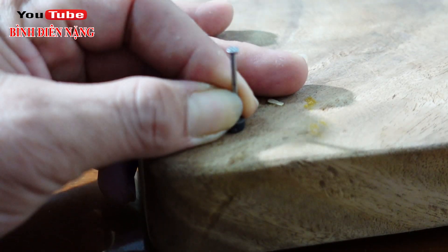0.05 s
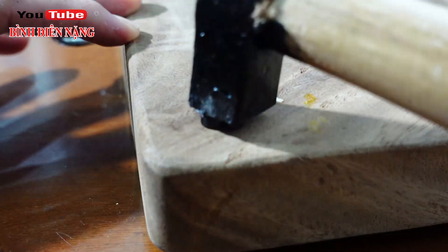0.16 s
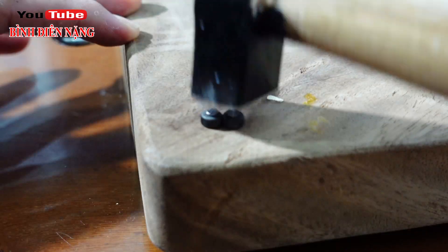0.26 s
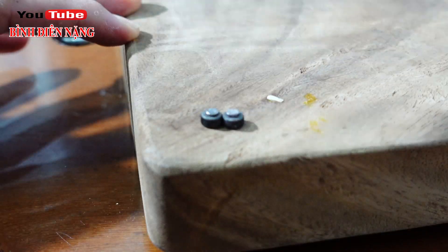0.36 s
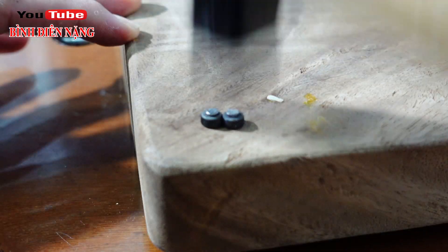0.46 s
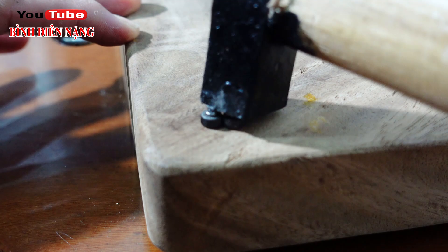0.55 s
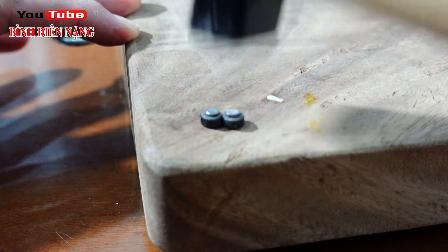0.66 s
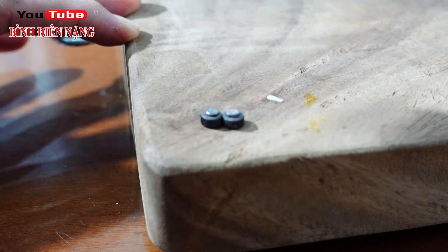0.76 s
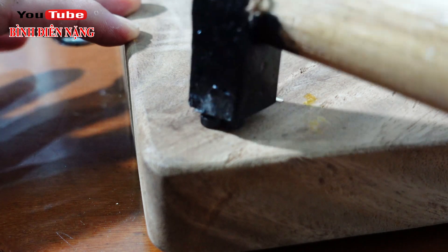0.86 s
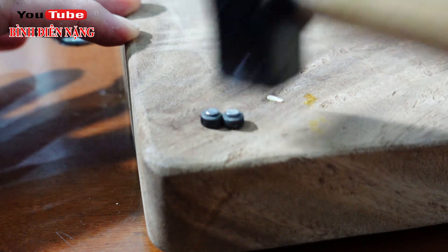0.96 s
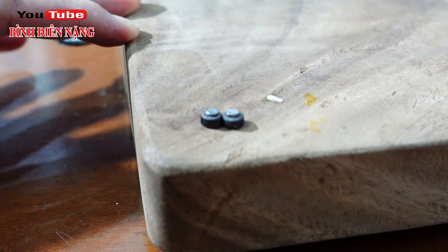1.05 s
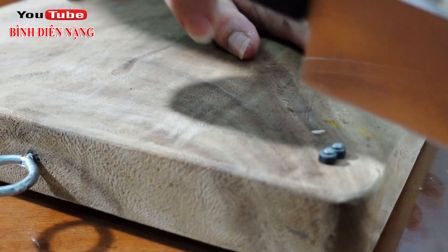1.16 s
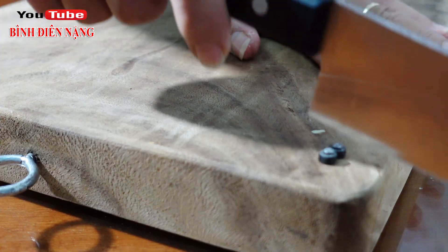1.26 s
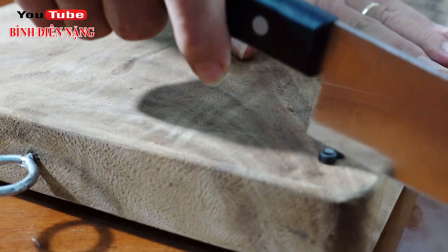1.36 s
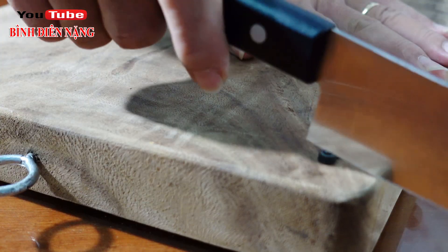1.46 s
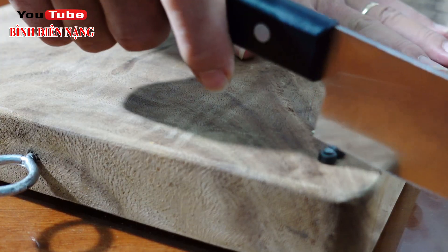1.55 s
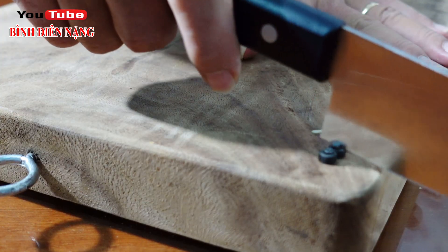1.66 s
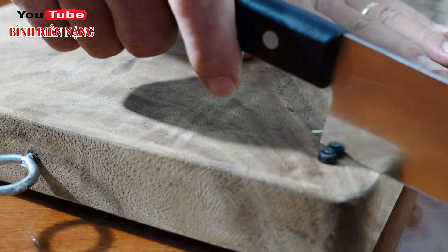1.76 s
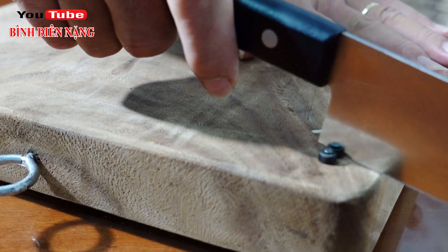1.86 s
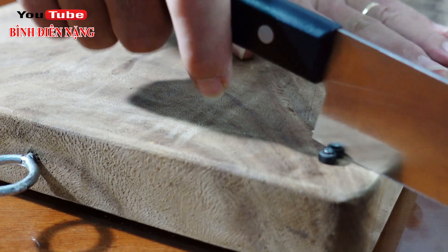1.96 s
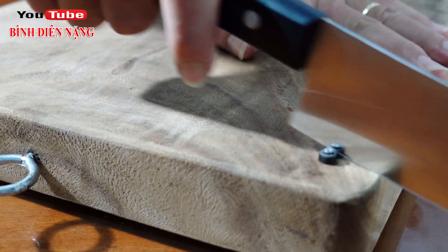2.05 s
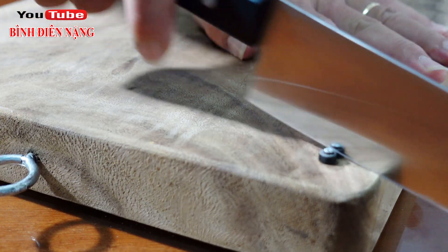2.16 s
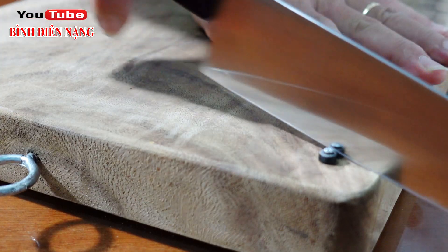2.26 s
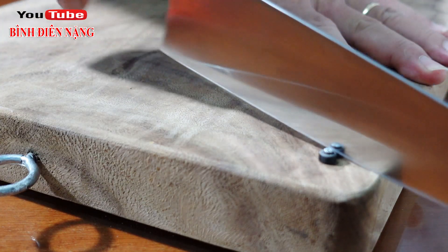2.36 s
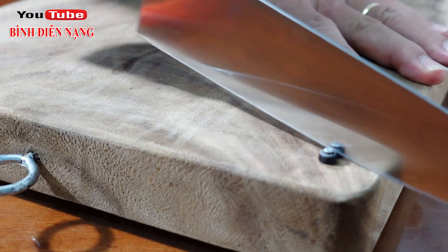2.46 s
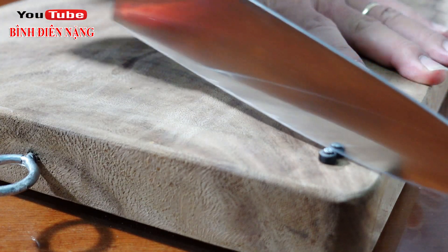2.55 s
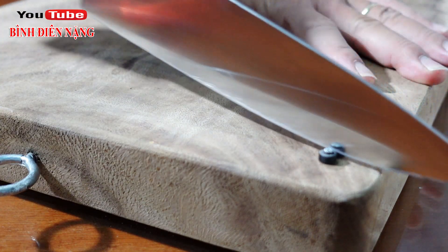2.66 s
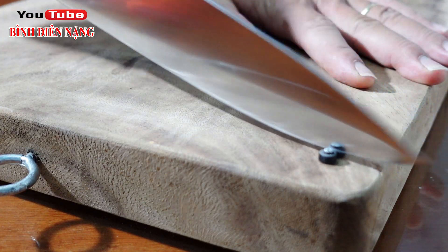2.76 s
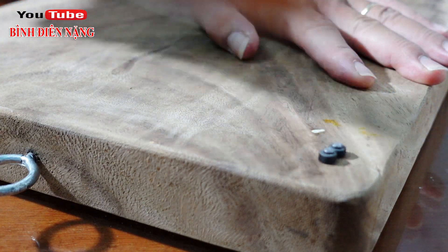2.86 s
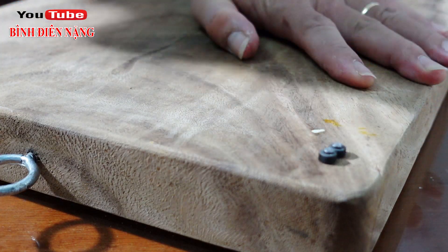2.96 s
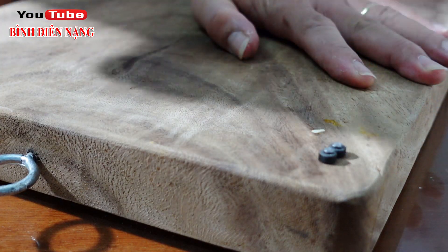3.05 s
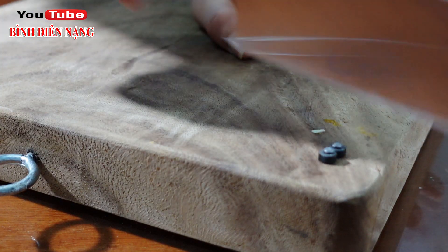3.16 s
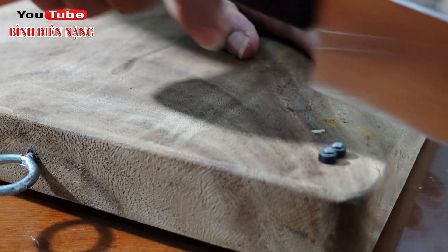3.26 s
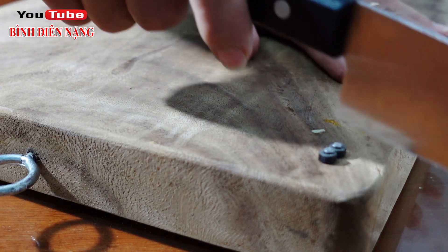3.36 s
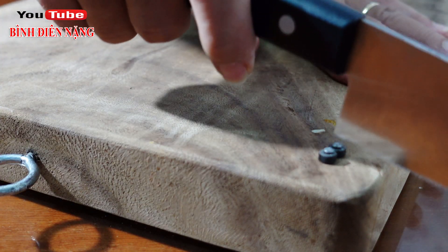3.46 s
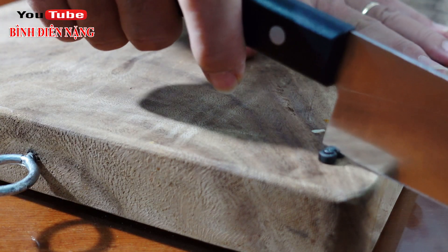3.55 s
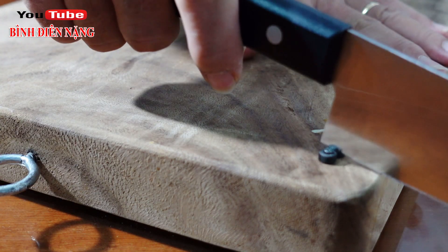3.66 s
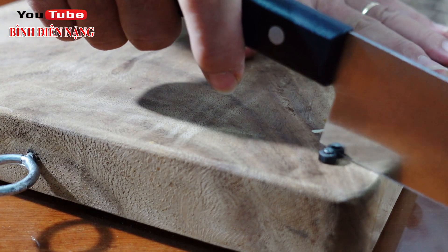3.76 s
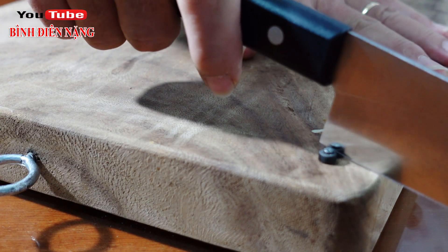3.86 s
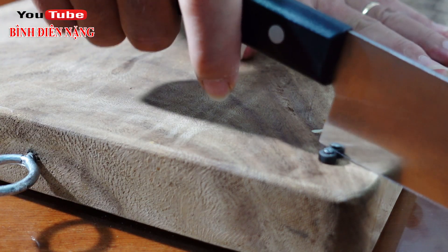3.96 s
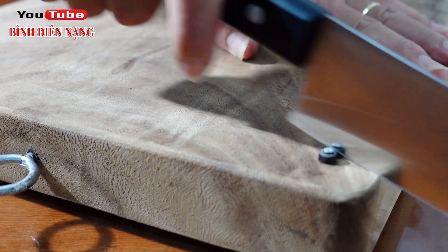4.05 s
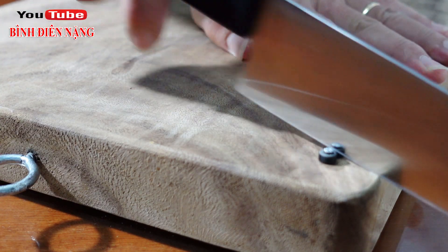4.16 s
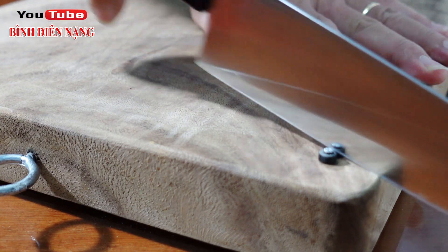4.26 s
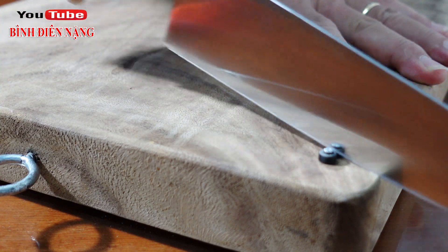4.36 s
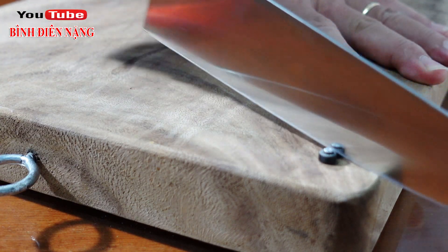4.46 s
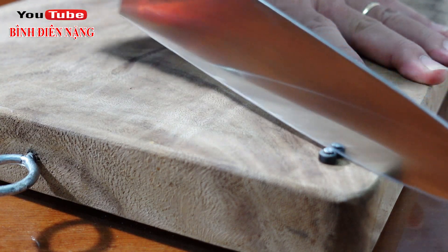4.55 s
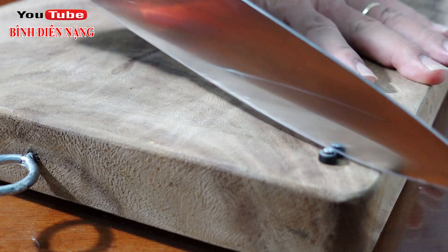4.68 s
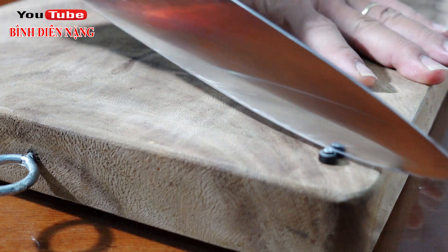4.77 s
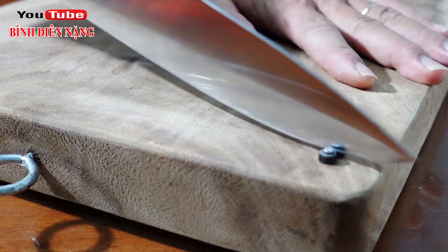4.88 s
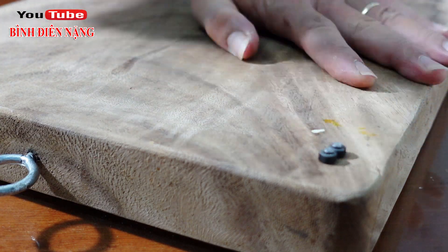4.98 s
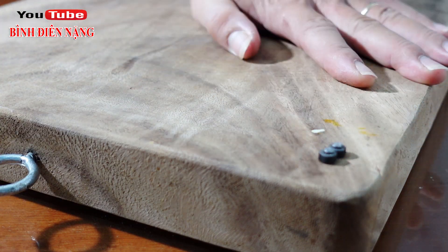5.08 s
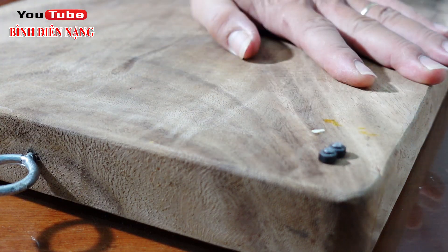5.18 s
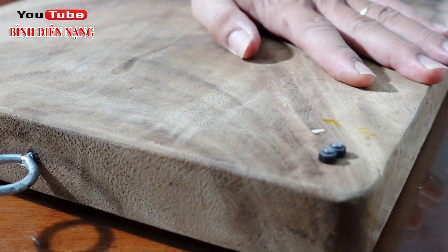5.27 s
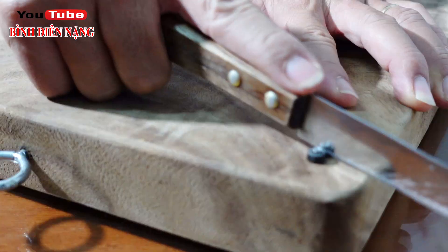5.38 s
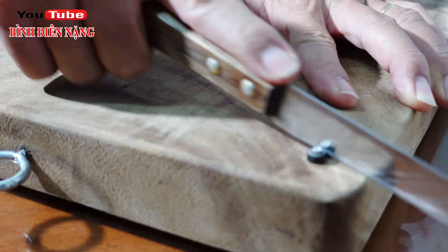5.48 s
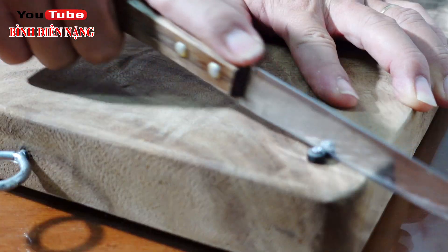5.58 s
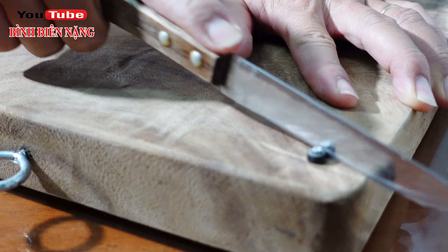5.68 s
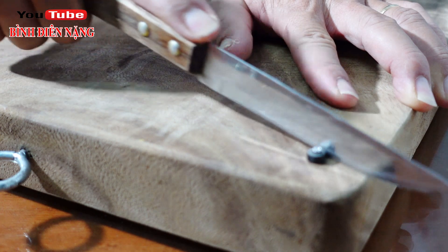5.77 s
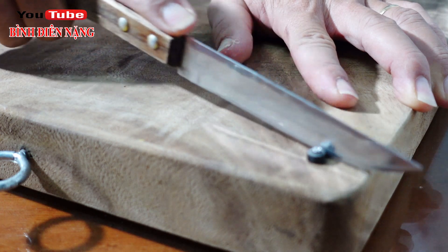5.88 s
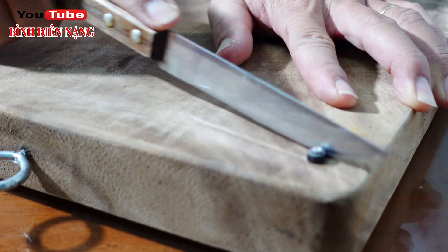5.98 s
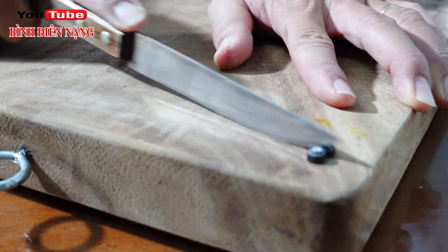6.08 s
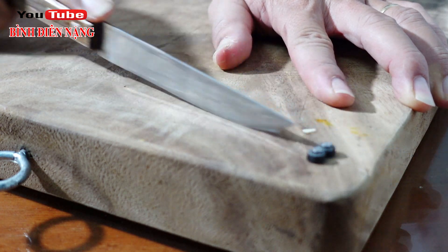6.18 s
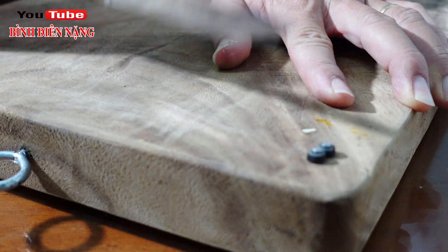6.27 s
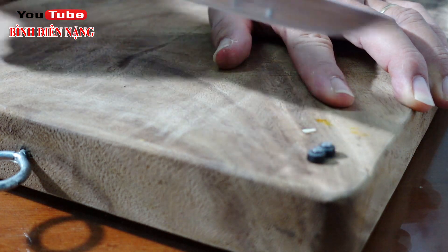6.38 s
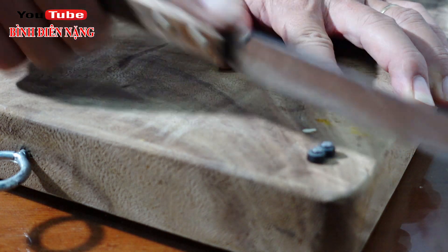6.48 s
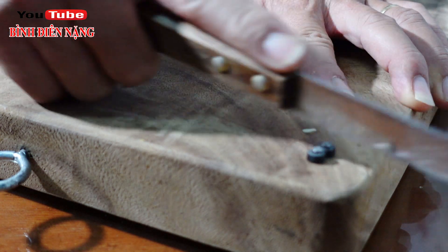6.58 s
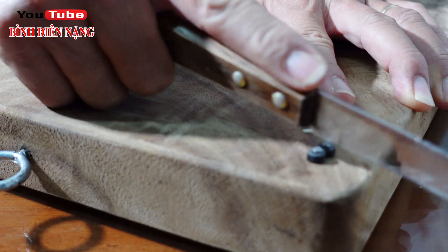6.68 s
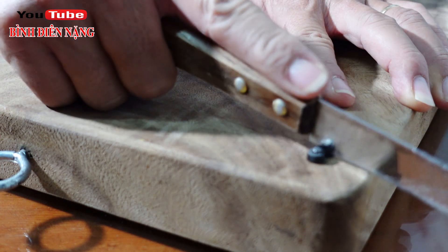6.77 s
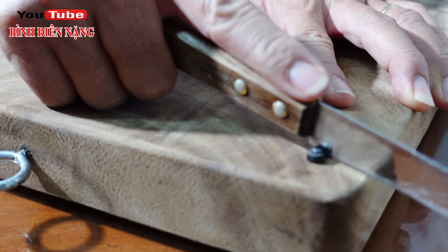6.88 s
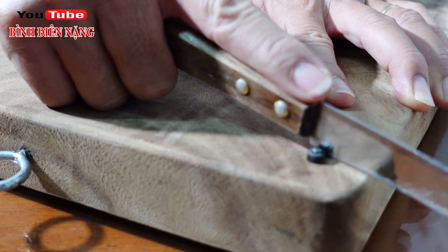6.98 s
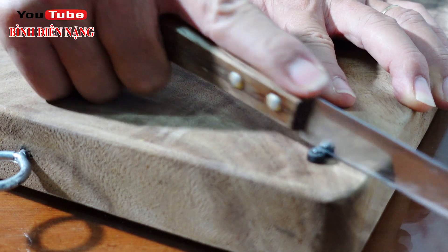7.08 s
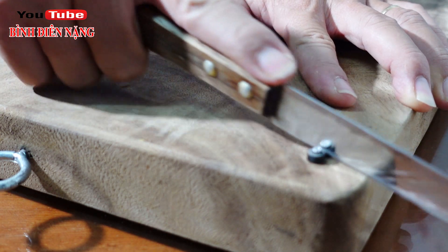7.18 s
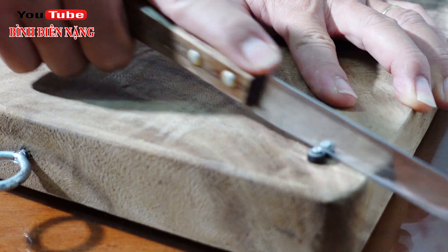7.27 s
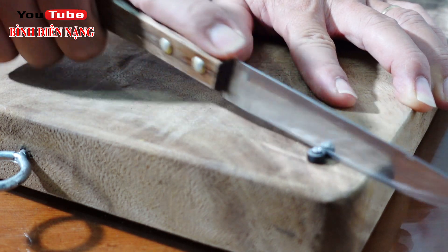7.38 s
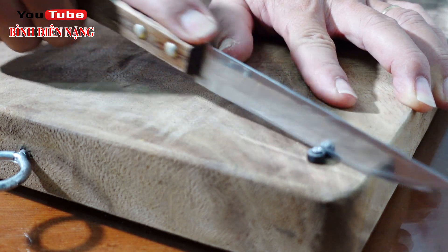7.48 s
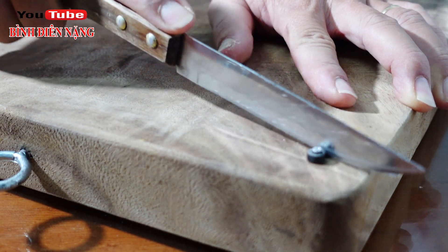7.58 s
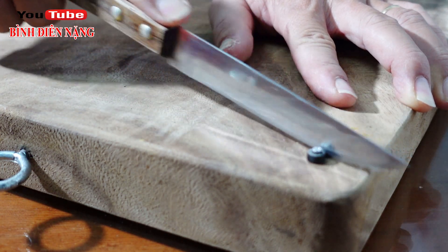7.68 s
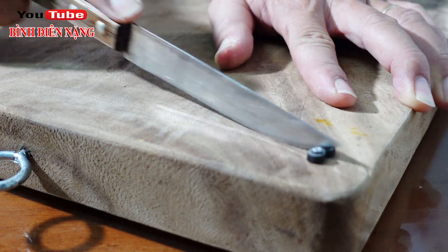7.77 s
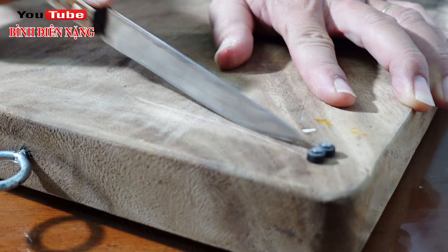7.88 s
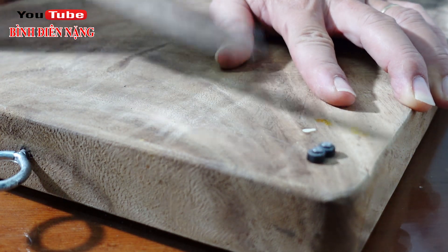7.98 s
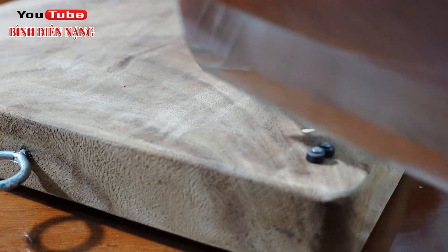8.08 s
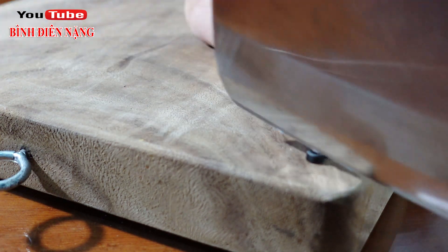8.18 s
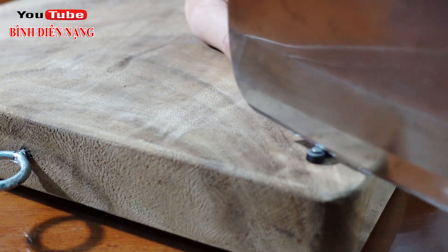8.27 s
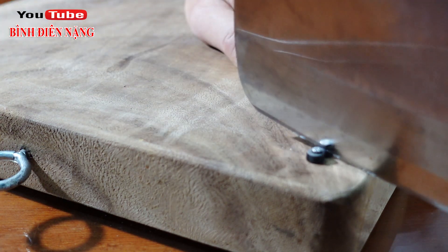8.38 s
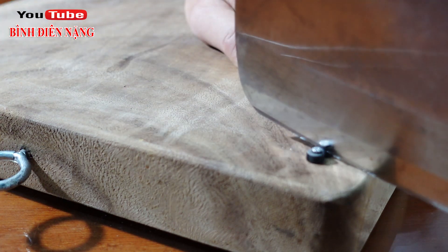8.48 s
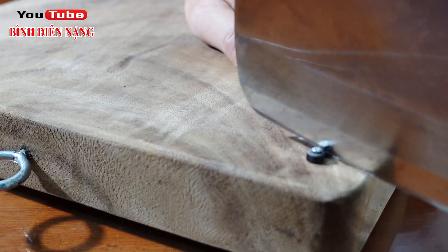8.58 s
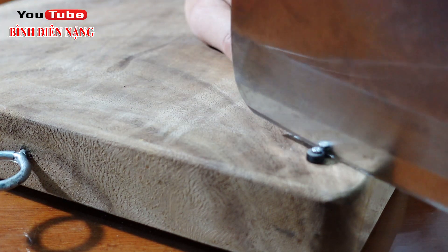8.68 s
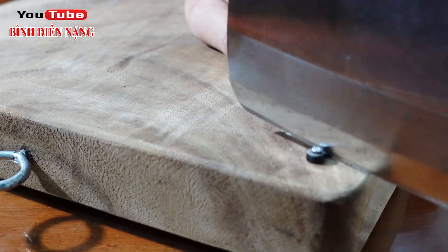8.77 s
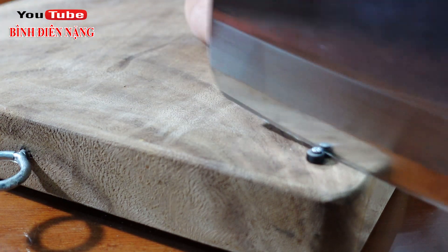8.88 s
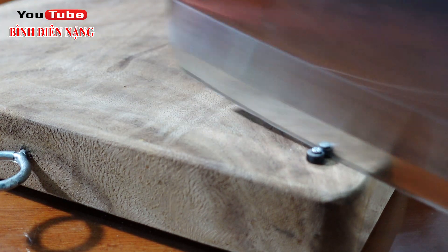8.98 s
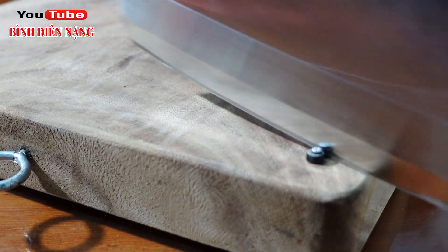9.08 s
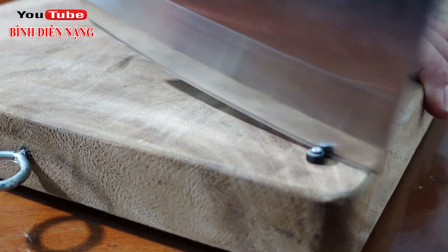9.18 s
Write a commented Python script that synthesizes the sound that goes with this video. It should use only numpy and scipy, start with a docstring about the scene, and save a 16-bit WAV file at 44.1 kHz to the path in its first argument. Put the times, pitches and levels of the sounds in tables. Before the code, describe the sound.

Three evenly spaced, hard hammer knocks echo off the walls. After a short quiet gap, steel taps on wheels fixed to a chopping board, and long gritty pulls rasp through, growing then stopping abruptly. Two cleaver strokes come first, then several quick knife strokes, a soft hiss, and finally a heavier chopper with a cluster of knocks and a loud stroke. Close stereo microphone, lively room, low background noise.

```python
"""A hammer nails two small flint wheels to a thick chopping board: noisy cracks with an echo and ringing tones.
A cleaver, a small knife and a broad chopper are then set down on the wheels and drawn through, rasping.
Trains of tiny impacts shake the resonances of board, blade and edge; knocks, squeals and scrapes join in.
Room noise, swells of soft hiss and one faint squeak lie behind, and a limiter flattens the loud peaks."""
import sys
import numpy as np
from scipy import signal
from scipy.fft import rfft, irfft, next_fast_len
from scipy.io import wavfile
from scipy.ndimage import uniform_filter1d, minimum_filter1d, map_coordinates

SR = 44100
rng = np.random.default_rng(int(sys.argv[2]) if len(sys.argv) > 2 else 0)


def master(y):
    """Save y as 16-bit WAV."""
    cut = np.clip(np.atleast_2d(y).T, -1, 1)
    pcm = np.round(cut * 32767)  # scale
    wavfile.write(sys.argv[1], SR, pcm.astype(np.int16))


N = 407043

# Times where the scene changes abruptly, cutting off what still sounds: (time [s])
SECTION_TIMES = (.15, 1.187, 8.123)
# Stereo spread of the echo and the room noise: (frequency [Hz], side over mid [dB])
STEREO_WIDTH = [(120, -84), (350, -20), (700, -10.5), (1400, -5.5), (5000, -7.5), (13000, -2.5)]
# The heel of a big blade is on the wheels, off the board and free to sing:
# (start [s], end [s], edge gain [dB])
HEEL_PASSES = [(1.9, 2.39, 4), (3.95, 4.225, 8), (9.058, 9.4, 2.5)]


def amp(db):
    """Decibels to gain."""
    return 10 ** (np.asarray(db) / 20)


def unit(x):
    """Scale to rms 1."""
    return x / np.sqrt(np.mean(x ** 2) + 1e-20)


def clock():
    """The time of every sample [s]."""
    return np.arange(N) / SR


def along(points, hz):
    """Read (frequency [Hz], value) points on a log frequency axis."""
    f, v = np.transpose(points)
    return np.interp(np.log(hz + 1), np.log(f + 1), v)


def gate(start, end, fade=0.0091):
    """One between two times, with ramps of length fade [s]."""
    opening = np.clip((clock() - start) / fade + .5, 0, 1)
    closing = np.clip((end - clock()) / fade + .5, 0, 1)
    return opening * closing


def swell(s, rise, fall):
    """A bell-shaped rise to one at time s and its fall."""
    t = clock() - s
    return np.exp(-np.minimum((t / np.where(t < 0, rise, fall)) ** 2, 50))


def wobble(rate):
    """A smooth random curve, rate knots a second."""
    knots = rng.standard_normal(int(N * rate / SR) + 4)
    return map_coordinates(knots, [clock() * rate], order=2)


def filtered(x, response):
    """Shape x by a gain that depends on frequency."""
    m = next_fast_len(x.shape[-1] + 8192)
    return irfft(rfft(x, m) * response(np.fft.rfftfreq(m, 1 / SR)), m)[..., :x.shape[-1]]


def body(colour, peaks, broad_db, loss=0.0049):
    """Gain against frequency: resonances, widened by the grip, standing on a broad spectrum."""
    def response(hz):
        power = amp(along(colour, hz) + broad_db) ** 2
        for centre, width, db in peaks:
            damped_width = np.hypot(width, loss * centre)
            power = power + amp(db) ** 2 / (1 + ((hz - centre) / damped_width) ** 2 * 2) ** 2
        return np.sqrt(power)
    return response


def impulse(response, size=4096):
    """The causal (minimum-phase) impulse response of a gain curve, with energy 1."""
    cepstrum = irfft(np.log(np.maximum(response(np.fft.rfftfreq(size, 1 / SR)), 1e-6)))
    cepstrum[1:size // 2] *= 2
    cepstrum[size // 2 + 1:] = 0
    h = irfft(np.exp(rfft(cepstrum)))
    return h / np.linalg.norm(h)


def add(track, s, sound):
    """Mix a sound in at time s."""
    i = round(s * SR)
    part = sound[..., max(-i, 0):max(N - i, 0)]
    track[..., max(i, 0):max(i, 0) + part.shape[-1]] += part


def room_tail(build=0.0027):
    """A stereo echo: noise that builds up, then dies at its own rate in each band, bass alike at both ears."""
    # Decay of the bare room: (frequency [Hz], 60 dB decay time [s])
    decay_times = [(150, 0.53), (500, 0.59), (2000, 0.63), (5000, 0.52), (9000, 0.44), (15000, 0.64)]
    hz, t, z = signal.stft(rng.standard_normal((2, SR)), SR, nperseg=256)
    decay = amp(-60 * t / along(decay_times, hz)[:, None])
    mid, side = signal.istft(z * decay, SR, nperseg=256)[1][:, :SR]
    side = filtered(side, lambda f: amp(along(STEREO_WIDTH, f)))
    rise = 1 - np.exp(-np.arange(SR) / SR / build)
    # the middle channel has energy 1
    return np.array([mid + side, mid - side]) * rise / np.linalg.norm(mid * rise)


def in_room(x, wet_db):
    """Direct sound plus echo, at about unchanged power."""
    echo = signal.fftconvolve(x[None], room_tail(), axes=1)[:, :len(x)]
    return (x + amp(wet_db) * echo) / np.hypot(1, amp(wet_db))


def hammer(echo_db=23.0, crack_db=4, crack_hz=1700, crack_t60=0.027, grit_db=-8, build=0.014,
           earlier_db=9, ring_db=-16, ring_t60=0.58, blur=0.044):
    """The dying echo of an earlier knock, then hard cracks that fall in pitch as the nail sinks; the room rings."""
    # Hammer blows: (time [s], strength [dB])
    blow_list = [(-.11, 3.5), (.222, 3.5), (0.5617, 3), (.892, 1.5)]
    # Colour of nail and board: (frequency [Hz], relative level [dB])
    nail_colour = [(35, -67), (60, -50), (327, -16.5), (394, -10), (497, -13), (559, -3.5), (642, -17),
                   (705, -9), (999, -10.5), (1550, -4.5), (2250, -3.5), (3190, -6), (6870, -22.5),
                   (8670, -22), (15500, -55.5)]
    # Colour of the earlier knock's echo: (frequency [Hz], relative level [dB])
    earlier_colour = [(47, -66), (80, -21), (318, 8), (387, 13.5), (562, 17.5), (627, 13), (890, 11.5),
                      (2550, 3), (3240, 5), (5240, 1), (7780, -6), (15000, -33)]
    # Tones that hang on after each blow: (frequency [Hz], relative level [dB])
    ring_tones = [(1610, -37), (1685, -49), (1809, -46), (1900, -53), (2245, -35.5), (2471, -46),
                  (2902, -48), (3063, -39), (3165, -41)]
    blows, earlier, t = np.zeros((2, N)), np.zeros((2, N)), np.arange(SR) / SR
    nail = impulse(lambda hz: amp(along(nail_colour, hz)))
    contact = signal.butter(2, [700, 8000], "bandpass", fs=SR, output="sos")
    for s, db in blow_list:
        # the pitch starts at three times crack_hz and settles on it
        pitch = crack_hz * (1 + 2 * np.exp(-t / 0.00067))
        grit = amp(grit_db) * signal.fftconvolve(rng.standard_normal(SR), nail)[:SR]
        crack = np.tanh(np.sin(2 * np.pi * np.cumsum(pitch) / SR) + grit)
        crack = signal.sosfilt(contact, crack * amp(crack_db - 60 * t / crack_t60))
        # the walls answer in uneven clumps
        clumps = room_tail(build) * amp(1.44 * wobble(123)[:SR])
        echo = signal.fftconvolve(clumps, nail[None], axes=1)[:, :SR]
        tones = np.zeros(SR)
        for hz, level in ring_tones:
            drift = np.cumsum(blur * rng.standard_normal(SR))  # a wandering phase blurs the tone
            tones += amp(level) * np.sin(2 * np.pi * hz * t + drift)
        ring = unit(tones) * amp(ring_db - 60 * t / ring_t60) * (1 - np.exp(-t / build))
        add(blows, s, amp(db) * (crack + amp(echo_db) * echo + ring))
    earlier_echo = filtered(room_tail(), lambda hz: amp(along(earlier_colour, hz)))
    add(earlier, -.02, amp(earlier_db) * earlier_echo)
    return earlier * gate(-1, SECTION_TIMES[0]) + blows * gate(SECTION_TIMES[0], SECTION_TIMES[1])


def diffuse(response):
    """Stereo noise that arrives from all round the room, at rms 1."""
    mid, side = filtered(rng.standard_normal((2, N)), response)
    side = filtered(side, lambda hz: amp(along(STEREO_WIDTH, hz)))
    return unit(np.array([mid + side, mid - side]))


def room_air(air_db=-53.5):
    """Room noise: diffuse coloured noise whose level barely wavers."""
    # Broad colour of the air: (frequency [Hz], relative level [dB])
    air_colour = [(24, -90), (40, -53), (158, -14.5), (247, -9.5), (778, -1), (1520, -5), (1770, -19),
                  (2330, -2), (3740, -28), (6160, -19), (6810, -4), (7910, -17.5), (15500, -25)]
    # Resonances of the air: (frequency [Hz], width [Hz], relative level [dB])
    air_peaks = [(460, 64, 8), (1743, 340, 9.5), (3960, 1440, 1), (7160, 350, -23)]
    return amp(air_db + 0.058 * wobble(5.4)) * diffuse(body(air_colour, air_peaks, broad_db=2.5))


def registers(colour, peaks, broad_db=-1, low_hz=1300, high_hz=4500):
    """Impulse responses of the board, the blade and its thin edge: low, middle and high bands of one body."""
    # Booms of the board and the table under it: (frequency [Hz], width [Hz], relative level [dB])
    booms = [(171, 8, -5), (93, 26, -20), (357.7, 19, 6)]
    whole = body(colour, peaks + booms, broad_db)

    def below(hz, corner):
        return 1 / np.sqrt(1 + (hz / corner) ** 10)

    def above(hz, corner):
        return np.sqrt(1 - below(hz, corner) ** 2)

    return [impulse(lambda hz: whole(hz) * below(hz, low_hz)),
            impulse(lambda hz: whole(hz) * above(hz, low_hz) * below(hz, high_hz)),
            impulse(lambda hz: whole(hz) * above(hz, high_hz))]


def knocks(start, end, voices, ring, chatter_t60=0.079, attack=0.0025):
    """The steel chatters briefly on the wheels (decaying noise) and rings at its own modes (sines)."""
    # Steel landing on or catching the wheels:
    # (time [s], ring level [dB], board level [dB], blade level [dB], edge level [dB])
    contacts = [(1.528, -36, -52, -48, -43.5), (1.782, -33, -29, -41, -42), (2.385, -35, -47, -32, -17),
                (2.573, -34, -18.5, -28, -37), (3.621, -32, -21, -33.5, -35),
                (3.804, -22.5, -17.5, -24, -26), (4.06, -33, -41, -37, -40), (4.962, -42, -22, -37, -28),
                (5.427, -43, -34.5, -30, -55.5), (5.493, -20.5, -22.5, -25, -35),
                (6.897, -17, -36.5, -24.5, -36), (7.076, -20, -24, -11, -34), (7.742, -38, -46, -28, -27),
                (8.475, -38, -23, -35, -40), (8.676, -17, -16.5, -22, -24), (8.734, -20, -20.5, -20, -28),
                (8.805, -19.5, -12.5, -19.5, -25.5), (8.838, -41, -20, -16, -26),
                (8.918, -30, -13, -29, -18.5)]
    out, t = np.zeros(N), np.arange(SR // 2) / SR
    decay = amp(-60 * t / chatter_t60)
    for s, ring_db, *levels in contacts:
        if start < s < end:
            chatter = rng.standard_normal(len(t)) * decay
            # board, blade and edge each take a set share of the blow's energy
            thud = sum(amp(db) * unit(signal.fftconvolve(chatter, h)[:len(t)])
                       for db, h in zip(levels, voices))
            thud *= np.sqrt(np.mean(decay ** 2))
            modes = np.zeros(len(t))
            for hz, db, t60 in ring:
                struck_db = db + 2 * rng.standard_normal()  # each landing excites the modes differently
                modes += amp(struck_db - 60 * t / t60) * np.sin(2 * np.pi * hz * t)
            add(out, s, (thud + amp(ring_db) * modes) * (1 - np.exp(-t / attack)))
    return out


def teeth(rate=4500, judder_db=2.5, judder_rate=170):
    """The wheel teeth chip the steel: dense tiny impacts, clumped by the judder of the blade."""
    judder = amp(judder_db * np.tanh(wobble(judder_rate)))
    chips = (rng.random(N) < rate / SR) * rng.standard_normal(N) * judder
    # the hand keeps the mean pressure steady while single chips vary
    mean_power = np.abs(uniform_filter1d(chips ** 2, size=1400))
    return unit(chips / np.sqrt(mean_power + 1e-6))


def at_heel(fade=0.14):
    """For each pass of a heel, one while it is on the wheels; fade [s] is the time to cross over."""
    return np.array([gate(start, end, fade) for start, end, _ in HEEL_PASSES])


def pressure(first, last, tremor_db=1.18, tremor_rate=22, board_db=-0.5, heel_board_db=-5.5, tip_s=0.031):
    """How hard the strokes drive board, blade and edge: attack, hold, a change of bite at the tip, release."""
    # Pulls through the wheels: (start [s], end [s], attack [s], release [s], level [dB],
    # edge over level [dB], extra bite of the curved tip [dB])
    strokes = [(1.918, 2.887, 0.36, 0.025, -31, -3.5, 11), (4.018, 5.009, 0.19, 0.026, -31.5, -3.5, -8.5),
               (5.384, 6.168, 0.17, .03, -33.5, -4.5, 3), (7.01, 7.35, 0.24, 0.055, -30, -6, -7.5),
               (7.314, 7.701, 0.091, 0.15, -29, -5, -3), (7.714, 7.881, 0.06, 0.034, -29, -4.5, 4.5),
               (8.828, 9.3, 0.15, .03, -23.5, -4.5, 4)]
    # How much of the tip's bite reaches board, blade and edge: (share [fraction of its dB])
    tip_shares = [0.24, 0.32, 0.97]
    # The hand presses harder or eases off: (time [s], level change [dB], half length [s])
    presses = [(2.2, 0.5, 0.022), (2.418, 4, .02), (4.244, 4.5, 0.01), (4.766, 5.5, 0.014),
               (4.84, -6, 0.05), (5.616, 4, 0.043), (5.911, 5, 0.059), (5.997, -1.5, .025),
               (6.104, 7, 0.049), (7.417, 3.5, 0.018), (7.51, -3.5, 0.027), (7.595, 4.5, 0.028),
               (7.802, 5.5, 0.017), (8.88, -5, 0.018)]
    t, drive, heel = clock(), np.zeros((3, N)), at_heel()
    for start, end, attack, release, db, edge_db, tip_db in strokes:
        if first < start < last:
            ramp = np.clip(np.minimum((t - start) / attack, (end - t) / release), 0, 1)
            grip = np.sin(np.pi / 2 * ramp) ** 2
            bite_db = np.outer(tip_shares, tip_db * swell(end - release, tip_s, tip_s))
            drive += grip * amp(db + bite_db) * amp([[board_db], [0], [edge_db]])
    hand_db = tremor_db * wobble(tremor_rate)
    for s, db, half in presses:
        if first < s < last:
            hand_db = hand_db + db * swell(s, half, half)
    # under the heel the board falls quiet and the edge comes forward
    edge_gain_db = np.array(HEEL_PASSES)[:, -1] @ heel
    heel_db = np.array([heel_board_db * heel.sum(axis=0), np.zeros(N), edge_gain_db])
    return drive * amp(hand_db + heel_db)


def gliding(x, rise, spacing=.028, renewal=21, sing_db=3.5, heel_sing_db=4):
    """The free length of blade changes as it is pulled, so its many bending resonances slide in pitch."""
    hz, t, z = signal.stft(x, SR, nperseg=512, noverlap=384)
    # bending waves crowd as the root of frequency; rise is the relative slide per second at 5 kHz
    place = (2 * np.sqrt(hz / 5000)[:, None] - rise * t) / spacing
    renewed = np.broadcast_to(t * renewal % 255, place.shape)
    ripple = map_coordinates(rng.standard_normal((256, 256)), [place % 255, renewed], order=2)
    # the resonances stand out more sharply at the heel
    depth_db = sing_db + heel_sing_db * np.interp(t, clock(), at_heel().sum(axis=0))
    gain = amp(depth_db * np.clip(ripple, -2, 2) * np.clip(hz[:, None] / 1500, 0, 1))
    gain /= np.sqrt(np.mean(gain ** 2, axis=0))
    return signal.istft(z * gain, SR, nperseg=512, noverlap=384)[1][:N]


def rasp(start, end, voices, rise):
    """One train of chips shakes board, blade and edge, each as hard as the stroke presses."""
    force = teeth()
    shaken = sum(signal.fftconvolve(force * g, h)[:N] for g, h in zip(pressure(start, end), voices))
    return gliding(shaken, rise)


def singing(rise=.6, arch=12, rough=0.063, flutter_db=4):
    """Friction locks on to one bending wave for a moment: a short, ragged squeal that rises and bends over."""
    # The edge sticks and squeals: (time [s], frequency [Hz], level [dB], half length [s])
    squeal_list = [(2.103, 6080, -28, 0.0095), (2.218, 3015, -23.5, 0.02), (2.234, 6500, -24.5, 0.037),
                   (2.265, 4600, -28.5, 0.05), (2.312, 5770, -20, 0.024), (2.39, 3630, -18.5, 0.0074),
                   (2.591, 6100, -36, 0.041), (4.17, 3010, -31, .02), (4.245, 4710, -28, .02),
                   (4.384, 5450, -30.5, 0.023), (9.018, 4120, -20, 0.0039), (9.125, 6040, -17, 0.0075),
                   (9.17, 8350, -19.5, 0.016)]
    out, t = np.zeros(N), np.arange(-SR // 10, SR // 10) / SR
    for s, hz, db, life in squeal_list:
        pitch = hz * np.exp(rise * t - arch * t ** 2)
        phase = 2 * np.pi * np.cumsum(pitch) / SR + np.cumsum(rough * rng.standard_normal(len(t)))
        # the grip comes and goes, so the squeal breaks up
        knots = t[::180]
        grip = amp(flutter_db * np.interp(t, knots, rng.standard_normal(len(knots))))
        add(out, s + t[0], amp(db) * unit(grip) / np.cosh(t / life) * np.sin(phase))
    return out


def scrapes():
    """A harder bite wakes a whole cluster of neighbouring blade modes at once: a burst of band noise."""
    # The edge digs in or slips off with a hoarse scrape:
    # (time [s], frequency [Hz], width [Hz], level [dB], half length [s])
    scrape_list = [(2.853, 5160, 2550, -26, 0.029), (4.966, 1560, 666, -24.5, 0.023),
                   (7.124, 2250, 483, -25.5, 0.048)]
    out, t = np.zeros(N), np.arange(-SR // 8, SR // 8) / SR
    for s, centre, width, db, life in scrape_list:
        noise = rng.standard_normal(len(t))
        cluster = unit(filtered(noise, lambda hz: 1 / (1 + ((hz - centre) / width) ** 4)))
        add(out, s + t[0], amp(db) * np.exp(-(t / life) ** 2) * cluster)
    return out


def blades(rasp_wet_db=-4, knock_wet_db=-5, loose_db=9, cleaver_rise=.7, knife_rise=.15, chopper_rise=-0.27):
    """Three blades in turn, each with its own resonances, are set on the wheels and pulled through."""
    # Broad colour of each blade on the wheels: (frequency [Hz], relative level [dB])
    cleaver_colour = [(29, -79), (50, -38), (166, -11), (256, -16), (358, 9), (477, 3.5), (684, 2.5),
                      (1470, -1), (2060, 2.5), (3500, -2.5), (4240, -7), (5790, -11.5), (8920, -11),
                      (15500, -27.5)]
    knife_colour = [(29, -66), (50, -34), (162, -15), (238, -58), (275, -2), (404, -5), (578, -2),
                    (870, -2.5), (1370, -13.5), (2110, -6.5), (3340, -15), (4240, -18), (9590, -18),
                    (15500, -38.5)]
    chopper_colour = [(29, -60), (50, -38), (162, -1.5), (262, -10), (358, 5), (525, 5), (637, 0.5),
                      (1920, -11.5), (2330, -11), (5140, -13), (5930, -11), (6690, -10), (8510, -3.5),
                      (15500, -23.5)]
    # Resonances of each blade pressed on the board: (frequency [Hz], width [Hz], relative level [dB])
    cleaver_peaks = [(392, 74, 4.5), (694, 12.5, 13), (850, 170, 4), (1650, 96, 0), (2118, 40, 7),
                     (2766, 66, 6), (3294, 310, 0), (4970, 87, -4), (5740, 42, -1.5), (7600, 140, -33),
                     (8400, 140, -13), (9200, 43, -3.5)]
    knife_peaks = [(413, 54.5, 7.5), (874, 116, -5.5), (2050, 280, -7.5), (2920, 19, -31), (3331, 240, -6),
                   (4730, 160, -17.5), (5300, 190, -16.5), (6010, 230, -11.5), (7620, 140, -21),
                   (8700, 69, -17), (9450, 220, -35)]
    chopper_peaks = [(384, 51, -13), (2216, 150, -3), (2760, 100, -10), (3370, 130, -4.5), (4040, 220, -9),
                     (5660, 160, -5), (5900, 130, -10), (6930, 170, -17), (8330, 52, -14), (8500, 41, -14),
                     (10000, 470, -5)]
    # Free ring of each blade: (frequency [Hz], relative level [dB], 60 dB decay time [s])
    cleaver_ring = [(1610, -20.5, 0.55), (2260, -25, .5), (3800, -21, 0.5), (4080, 5, 0.048),
                    (4740, 0, 0.048), (5600, -23, 0.52), (6320, -26, 0.23), (8800, -44, 0.53)]
    knife_ring = [(2040, -22, 0.12), (2945, -37, 0.17), (3020, -20, 0.18), (5300, -8.5, 0.045),
                  (7100, -3, 0.029)]
    chopper_ring = [(516, -5.5, 0.16), (3390, 7.5, 0.046), (3830, -7, 0.095), (4910, -18, 0.14),
                    (7320, -21, 0.48), (7880, -9, 0.096)]
    turns = [(SECTION_TIMES[1], 5.2, cleaver_colour, cleaver_peaks, cleaver_ring, cleaver_rise),
             (5.2, SECTION_TIMES[2], knife_colour, knife_peaks, knife_ring, knife_rise),
             (SECTION_TIMES[2], 10, chopper_colour, chopper_peaks, chopper_ring, chopper_rise)]
    pulled, set_down = singing() + scrapes(), np.zeros((2, N))
    for start, end, colour, peaks, ring, rise in turns:
        # a blade that only lands is not clamped to the board, so its knock is broader in colour
        loose = registers(colour, peaks, broad_db=loose_db)
        set_down += in_room(knocks(start, end, loose, ring), knock_wet_db)
        pulled = pulled + rasp(start, end, registers(colour, peaks), rise)
    return in_room(pulled, rasp_wet_db) + set_down


def soft_hiss():
    """Diffuse coloured noise that swells softly between strokes."""
    # Swells of hiss: (crest time [s], level [dB], rise [s], fall [s])
    swells = [(3.19, -46.5, 0.048, 0.086), (3.345, -49, 0.036, 0.11), (6.69, -47.5, 0.29, 0.43),
              (8.06, -34, 0.12, 0.11)]
    # Colour of the hiss: (frequency [Hz], relative level [dB])
    hiss_colour = [(180, -33), (300, -3.5), (424, -43), (468, -9), (600, -10), (3940, 1), (9140, -9),
                   (15500, -18.5)]
    level = sum(amp(db) * swell(s, rise, fall) for s, db, rise, fall in swells)
    level = level * gate(SECTION_TIMES[1], SECTION_TIMES[2])
    return level * diffuse(lambda hz: amp(along(hiss_colour, hz)))


def squeak(pitch_hz=4370, width_hz=70, level_db=-46, overtone_db=-7):
    """A faint thin squeak: a narrow band of noise with its octave, echoing in the room."""
    def band(centre, width):
        return unit(filtered(rng.standard_normal(N), lambda hz: np.exp(-((hz - centre) / width) ** 2)))

    tone = band(pitch_hz, width_hz) + amp(overtone_db) * band(2 * pitch_hz, 2 * width_hz)
    return in_room(amp(level_db) * tone * gate(3.32, 3.436, fade=0.042), wet_db=-5)


def scene():
    """Hammer, blades and room together, leaning a little to the right over most of the spectrum."""
    # Stereo balance: (frequency [Hz], left over right [dB])
    lean = [(60, -7), (150, 0.5), (380, -1), (950, -1.0), (2380, -1.0), (5980, -2.5), (15000, -0.5)]
    mix = hammer() + room_air() + blades() + soft_hiss() + squeak()
    return filtered(mix, lambda hz: amp(np.outer([1, -1], along(lean, hz)) / 2))


def limiter(x, ceiling=0.61, recovery_db=90):
    """The gain drops just ahead of a peak and climbs back at recovery_db [dB/s]."""
    over = 20 * np.log10(np.maximum(np.abs(x).max(axis=0) / ceiling, 1))
    climb = recovery_db * clock()
    duck = minimum_filter1d(climb - np.maximum.accumulate(over + climb), size=65)
    return x * amp(uniform_filter1d(duck, size=65))


def record(dry, low_hz=65, top_hz=15850):
    """Limit the peaks, thin the deep bass and keep nothing from the band limit top_hz up."""
    def band_limit(hz):
        return (hz < top_hz) * hz ** 2 / np.hypot(hz ** 2, low_hz ** 2)

    return filtered(limiter(dry), band_limit)


dry = scene()
out = record(dry)
master(out)
```